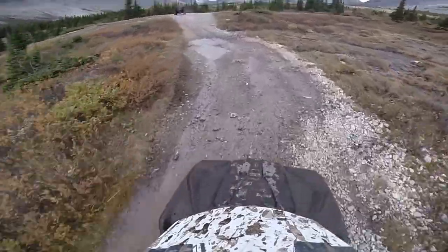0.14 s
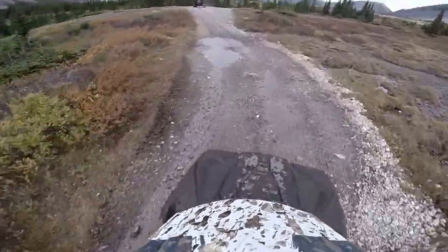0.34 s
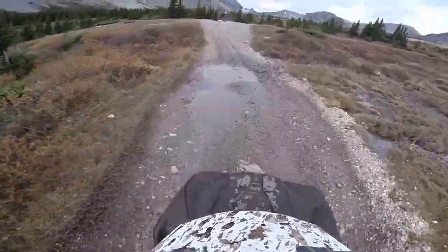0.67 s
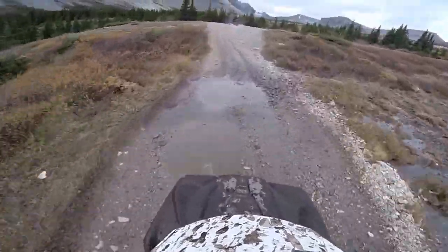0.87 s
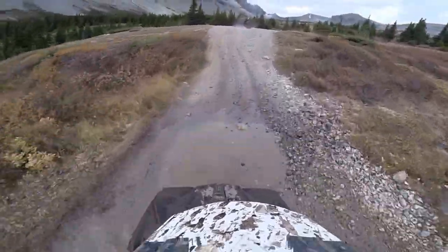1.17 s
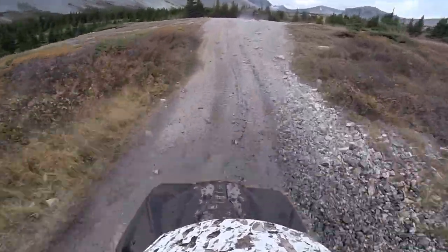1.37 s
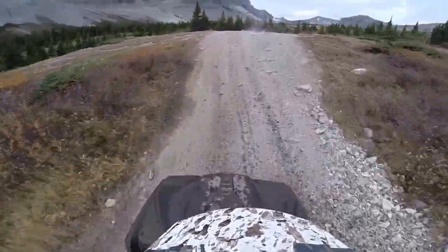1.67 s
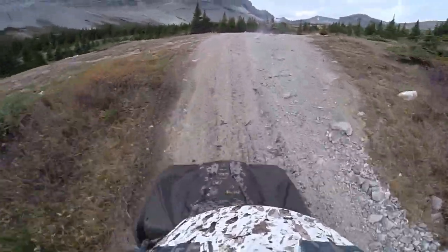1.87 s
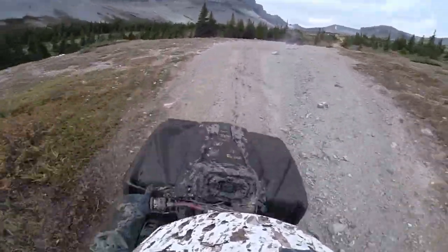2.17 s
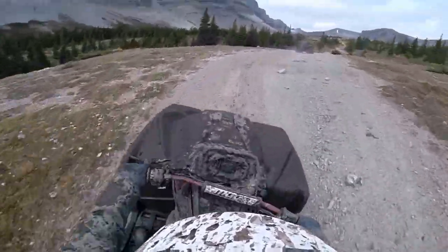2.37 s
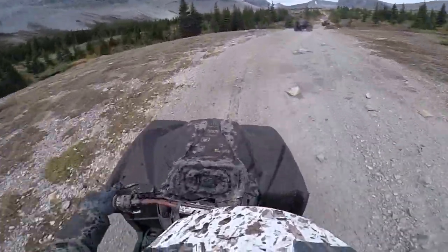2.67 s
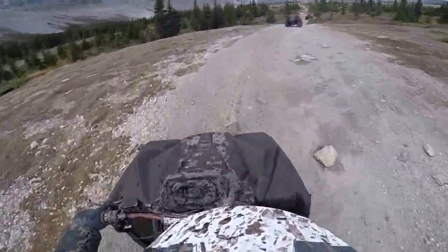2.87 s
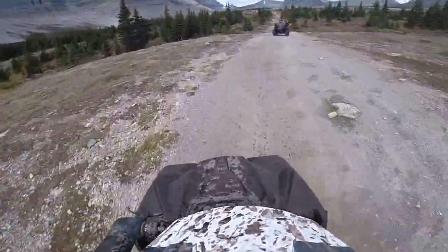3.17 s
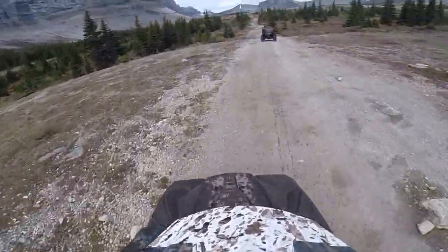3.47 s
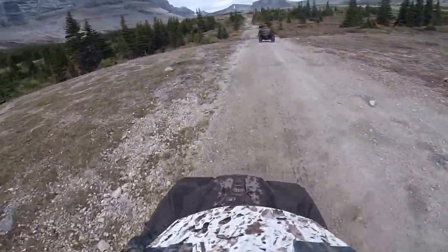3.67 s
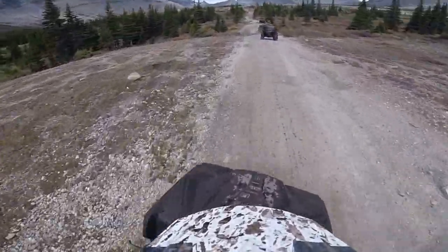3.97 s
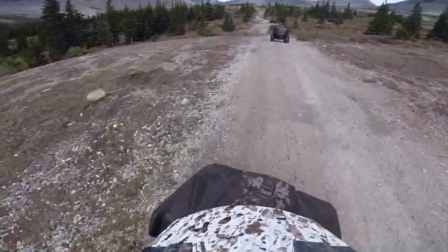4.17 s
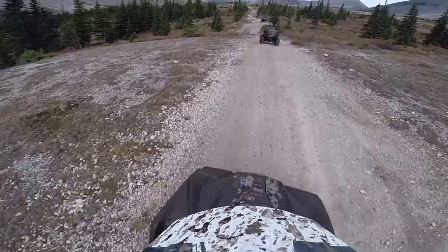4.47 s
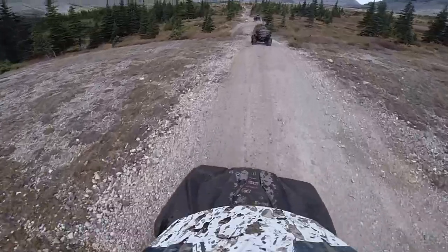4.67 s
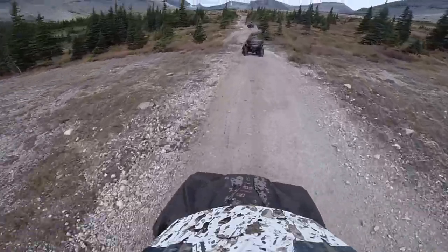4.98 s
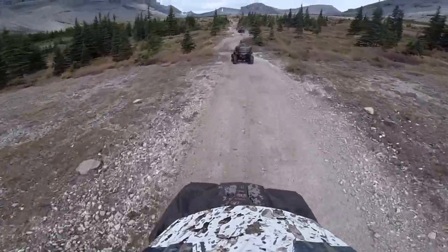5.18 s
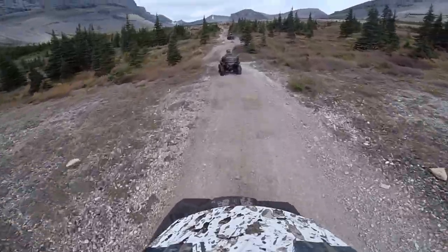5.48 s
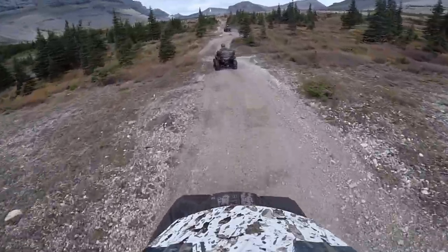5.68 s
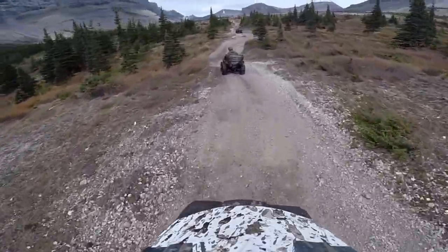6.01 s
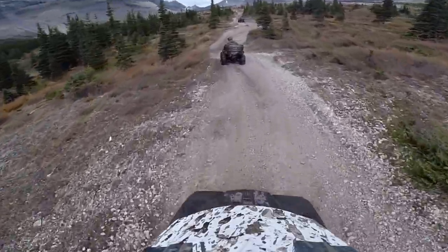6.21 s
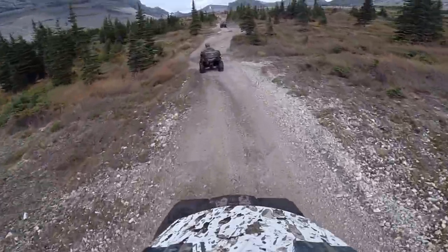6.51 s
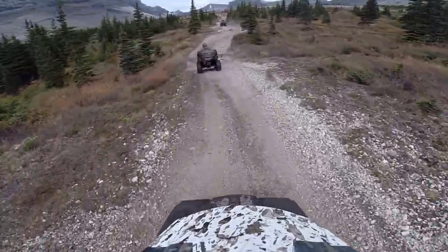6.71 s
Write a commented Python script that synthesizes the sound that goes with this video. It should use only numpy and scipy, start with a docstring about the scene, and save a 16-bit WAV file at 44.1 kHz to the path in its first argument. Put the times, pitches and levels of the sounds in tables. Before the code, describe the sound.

Close at the rider's helmet, outdoors and dry, a quad bike engine works along gravel. From 0 to 2 seconds come short uneven throttle blips, each a booming, raspy bark with brief burbles between, over dense metallic clatter. The strongest pull runs from 2.0 to 2.5, climbing in pitch, with another blip before 2.8; then the revs fall quickly to a low at about 3.3, where brakes squeak very faintly. Further surges follow at 3.5, 4.05 and 4.5. Tyres crunch and spray grit, more under throttle; stones crack and ping at about 0.7, 1.0, 1.8, 3.2, 4.3 and sharply at 4.9. From 5 seconds it coasts, slowly slowing: a rapid ringing knock stands out over softer clatter, with thin whine and hum gliding down until about 6, and a flickering disc rub. Low wind buffets throughout, and the sound stops still coasting.

```python
"""A quad bike on a gravel trail, heard by a microphone at the rider's helmet.
First come bursts of throttle: the engine's orders boom and bark through pipe resonances over a clatter of taps.
Tyres crunch as noise and clicks, stones ring the chassis modes, the brakes squeak faintly as a wavering sine.
Then a long coast: the knock, two ringing modes hit once a cycle, stands out; drive whine and hum glide down
and a brake disc rubs, all as flickering sines. Low filtered noise is the wind buffeting throughout."""
import sys
import numpy as np
from scipy import signal
from scipy.fft import rfft, irfft
from scipy.io import wavfile
from scipy.ndimage import uniform_filter1d, map_coordinates

SR = 44100
rng = np.random.default_rng(int(sys.argv[2]) if len(sys.argv) > 2 else 0)


def digitize_waveform(pressure):
    """Quantize a signal to 16-bit integers and store it at the path in sys.argv[1].

    Rows of a 2-D input are taken as channels; values are limited to [-1, 1].
    """
    field = np.atleast_2d(pressure).T
    bounded = np.clip(field, -1, 1)
    quanta = np.round(bounded * 32767).astype(np.int16)
    wavfile.write(sys.argv[1], SR, quanta)


N = 302085
TIME = np.arange(N) / SR


def from_db(db):
    """Decibels to gain."""
    return 10 ** (np.asarray(db) / 20)


def rms_one(x):
    """Scale to unit power."""
    return x / np.sqrt(np.mean(x ** 2) + 1e-20)


def in_time(rows, at=TIME):
    """Each column of a curve, joined by straight lines."""
    s, *columns = np.transpose(rows)
    return [np.interp(at, s, column) for column in columns]


def drift(rate):
    """Smooth chance of spread 1, with the given number of random knots per second."""
    knots = rng.standard_normal(4096)
    curve = map_coordinates(knots, [TIME[::16] * rate], order=3, mode="wrap")
    return rms_one(curve).repeat(16)[:N]


def colour(x, spectrum):
    """Causal (minimum-phase) filter with the given spectrum; unit power."""
    hz, db = np.transpose(spectrum)
    grid = np.maximum(np.fft.rfftfreq(8192, 1 / SR), 1)
    grid_db = np.interp(np.log(grid), np.log(hz), db, right=db[-1] - 25)
    cepstrum = irfft(np.log(from_db(grid_db)))
    half = len(cepstrum) // 2
    # folding the cepstrum onto its first half makes the response causal
    folded = np.r_[cepstrum[0], 2 * cepstrum[1:half]]
    response = irfft(np.exp(rfft(folded, 2 * half)))
    return rms_one(signal.oaconvolve(x, response)[:len(x)])


def ring(x, hz, t60):
    """A damped resonance: a unit click sets a sine of height 1 ringing, 60 dB down after t60 seconds."""
    radius, turn = from_db(-60 / (t60 * SR)), 2 * np.pi * hz / SR
    return signal.lfilter([0, np.sin(turn)], [1, -2 * radius * np.cos(turn), radius * radius], x + 1e-18)


def pipe(hz, modes):
    """Complex response of parallel resonances at a frequency."""
    return sum(from_db(db) / (1 + 1j * (hz ** 2 - centre ** 2) / (hz * width)) for centre, width, db in modes)


def contacts(cycle, angle, spread_db, play):
    """One click each cycle at the given angle, uneven in strength (dB) and timing (play, in cycles)."""
    chance = rng.standard_normal((300, 2))
    at = np.searchsorted(cycle, np.arange(len(chance)) + angle + play * chance[:, 0])
    return np.bincount(at, from_db(spread_db * chance[:, 1]), N + 1)[:N]


def grains(per_s, spread_db):
    """Random clicks of either sign and unequal size."""
    sizes = from_db(spread_db * np.minimum(rng.exponential(1, N), 4)) * rng.choice([-1, 1], N)
    return sizes * (rng.random(N) < per_s / SR)


# The rider's thumb on the throttle. Each row: opens in seconds, shuts in seconds, depth from 0 to 1.
THROTTLE_BURSTS = [(0.09, 0.28, 0.77), (0.49, 0.93, 0.57), (1.05, 1.22, 0.74), (1.35, 1.49, 0.91),
                   (1.53, 1.62, 0.17), (1.67, 1.86, 0.72), (2.0, 2.46, 0.89), (2.57, 2.76, 0.57),
                   (3.46, 3.89, 0.53), (4.05, 4.25, 0.76), (4.48, 4.67, 0.47)]
PRESS_S, EASE_S, RELEASE_S = 0.073, 0.07, .13  # time constant of the press, ease ahead of the shut, release


def throttle_opening():
    """Each burst is a press that settles exponentially, a hold and a straight release."""
    opening = 0
    for opens, shut, depth in THROTTLE_BURSTS:
        press = -np.expm1(-np.maximum(TIME - opens, 0) / PRESS_S)
        release = np.clip(1 - (TIME - shut + EASE_S) / RELEASE_S, 0, 1)
        opening = opening + depth * press * release
    return opening


# Engine speed under the bursts. Each row: time in seconds, speed in four-stroke cycles per second.
BURST_SPEED = [(0.0, 42.1), (0.1, 38.5), (0.17, 40.9), (0.26, 42.7), (0.36, 40.2), (0.49, 36.6),
               (0.7, 43.7), (0.93, 46.0), (1.05, 40.3), (1.22, 44.8), (1.34, 39.2), (1.48, 41.1),
               (1.58, 39.9), (1.68, 40.1), (1.87, 42.9), (1.98, 38.4), (2.1, 43.6), (2.3, 49.6),
               (2.78, 48.9), (2.84, 45.5), (2.89, 39.8), (3.02, 33.9), (3.14, 31.5), (3.22, 31.5),
               (3.35, 30.2), (3.46, 31.6), (3.68, 41.7), (3.86, 47.6), (4.05, 37.6), (4.23, 42.9),
               (4.3, 39.4), (4.38, 36.6), (4.45, 33.6), (4.68, 38.1), (4.73, 35.0), (4.79, 33.1),
               (4.89, 30.9)]
# The long coast, engine slowing with the wheels. Each row: time in seconds, speed in cycles per second.
COAST_SPEED = [(4.96, 30.17), (5.1, 29.98), (5.35, 29.1), (5.6, 28.72), (5.85, 28.22), (6.1, 27.26),
               (6.35, 26.53), (6.6, 26.58), (6.85, 25.38)]


def engine_speed():
    """The engine spins up during bursts and runs down between them; then it coasts."""
    return in_time(BURST_SPEED + COAST_SPEED)[0]


# The engine's low orders, before silencer and boom. Each row: order (multiple of the cycle rate),
# level in dB coasting, level in dB on the overrun, level in dB pulling, level in dB flat out.
LOW_ORDERS = [(2, -30.5, -42.5, -39.5, -36.5), (3, -38.5, -45.5, -42.5, -24), (4, -63, -38, -42, -42.5),
              (5, -44, -45, -34.5, -30.0), (6, -32, -41, -36.5, -35.5), (7, -52, -55, -42.5, -36.5),
              (8, -49, -49, -31.5, -35), (9, -44.5, -47.5, -38, -40), (10, -49, -58, -54, -61),
              (11, -60.5, -50, -50, -35), (12, -54, -62, -34.5, -36), (13, -51, -59.5, -75, -34.5),
              (14, -59.5, -48, -40, -38.5), (15, -49.5, -63, -53, -41), (16, -92, -52, -42.5, -38),
              (17, -57.5, -54, -44, -74), (18, -61.5, -81, -52, -48), (19, -71, -52.5, -41, -47.5),
              (20, -65.5, -76, -54, -63), (21, -53, -72, -60, -43), (22, -68, -64, -44, -39),
              (23, -59.5, -65, -65, -66), (24, -66.5, -73, -44, -37.5)]
OVERRUN_SPEEDS, FLAT_OUT_SPEEDS = (29, 37), (43, 49)  # cycles per s over which each state sets in
BOOM_FULL = 0.74  # throttle at which the low orders reach full strength


def order_levels(speed, throttle, drone_orders=6):
    """Low orders in dB, blending from coasting to overrun with speed and to pulling or flat out with throttle."""
    fast = np.interp(speed, OVERRUN_SPEEDS, [0, 1])
    top = np.interp(speed, FLAT_OUT_SPEEDS, [0, 1])
    drone = np.interp(speed, [47, 49], [0, .7])  # at top speed the lowest orders drone on without throttle
    levels = {}
    for k, row in enumerate(LOW_ORDERS, 2):
        push = np.maximum(np.clip(throttle / BOOM_FULL, 0, 1), drone * (k <= drone_orders))
        shares = np.array([(1 - push) * (1 - fast), (1 - push) * fast, push * (1 - top), push * top])
        levels[k] = np.array(row[1:]) @ shares
    return levels


# Sharp pressure pulses sent out each cycle. Each row: angle in cycles, relative strength.
PRESSURE_PULSES = [(.45, 1), (.63, .8), (0, 1)]
# Pipe resonances that bark with the throttle open, relative to the bark.
# Each row: centre in Hz, width in Hz, level in dB before a common trim.
OPEN_RESONANCES = [(890, 65, -16), (1232, 86, -18), (1736, 190, -20.5), (2520, 410, -30)]
# Pipe resonances that time the single putt with the throttle shut; only their phase is heard.
# Each row: centre in Hz, width in Hz, weight in dB.
SHUT_RESONANCES = [(73, 28, -3), (238, 55, 0), (430, 80, -7), (620, 200, -16), (843, 96, -15)]
# The silencer, through which the low orders sweep. Each row: frequency in Hz, gain in dB.
SILENCER_GAIN = [(50.0, -22), (62.0, -3), (78.0, 0.5), (98.0, 4.5), (130.0, 2.3), (158.0, -26), (185.0, -3),
                 (212.0, 8), (245.0, 5), (270.0, -0.5), (295.0, 4), (340.0, -1.8), (375.0, -1),
                 (435.0, 3.5), (490.0, -2), (560.0, -6.5), (640.0, 0.5), (740.0, -6.5), (870.0, 4),
                 (1050.0, -6)]
# The boom of the low orders, fading out above BOOM_TOP_HZ. Each row: time in seconds, gain in dB.
BOOM_GAIN = [(0.03, 0), (0.2, 2), (0.36, -1), (0.55, 3), (0.7, 1), (0.86, 1.5), (1.03, 2.5), (1.2, 0.5),
             (1.45, 0.5), (1.65, 1.5), (1.85, 0.5), (2.2, 1), (2.52, -0.5), (2.68, 3), (2.8, 2.5), (3.0, 3),
             (3.35, -1.5), (3.55, 1), (3.8, 2.5), (4.0, -0.5), (4.25, 0.5), (4.4, -3), (4.55, 1), (4.8, 2),
             (5.0, 0), (6.85, -2.5)]
BOOM_TOP_HZ = 350
PUTT_ANGLE = .45  # place of the putt in the cycle
SMEAR_AT_HZ = 560  # the pipes delay the upper orders: one radian here, growing with the square of pitch
PART_SPEED_SMEAR = 2.2  # extra smear under load below top speed, where the pulses are blunter
# after every burst but the last the firing stumbles: delay in s, spread in s, unevenness in cycles
STUMBLE_AFTER_S, STUMBLE_S, STUMBLE_CYCLES = .08, .05, .008
WAVER_DB, WAVER_PER_S = 1.4, 16  # under load each low order wavers by itself, the upper ones up to twice as much


def exhaust(cycle, speed, throttle, load, bark_db, open_db=-5.0, first_db=-48, count=58):
    """Gas pulses repeat each cycle: their orders sweep through pipe resonances, and no two firings are alike."""
    # gains move slowly, so they are worked out at every 64th sample
    slow, speed, throttle, opening, bark_db = (v[::64] for v in (TIME, speed, throttle, load, bark_db))
    order_db, boom_db = order_levels(speed, throttle), in_time(BOOM_GAIN, slow)[0]
    stumble = sum(np.exp(-((TIME - shut - STUMBLE_AFTER_S) / STUMBLE_S) ** 2)
                  for _, shut, _ in THROTTLE_BURSTS[:-1])
    unevenness = .0012 + .002 * load + STUMBLE_CYCLES * stumble
    turn = np.exp(2j * np.pi * (cycle + unevenness * drift(45)))
    below_top_speed = np.interp(speed, FLAT_OUT_SPEEDS, [1, 0])
    smear = 1 + PART_SPEED_SMEAR * uniform_filter1d(opening * below_top_speed, size=100)
    out, wave = np.zeros(N), 1
    for k in range(1, count + 1):
        wave, hz = wave * turn, k * speed
        pulses = sum(strength * np.exp(-2j * np.pi * k * angle) for angle, strength in PRESSURE_PULSES)
        if k in order_db:
            # the low orders line up into sharp pulses under load, and into one ringing putt without
            putt = np.exp(1j * np.angle(pipe(hz, SHUT_RESONANCES)) - 2j * np.pi * k * PUTT_ANGLE)
            timing = uniform_filter1d(opening * pulses + (1 - opening) * putt, size=90)
            below_top = 1 / (1 + (hz / BOOM_TOP_HZ) ** 6)
            waver_db = WAVER_DB * (2 - below_top) * opening * drift(WAVER_PER_S)[::64]
            silencer_db = np.interp(hz, *np.transpose(SILENCER_GAIN))
            level_db = order_db[k] + silencer_db + below_top * boom_db + waver_db
            gain = from_db(level_db) * np.exp(1j * np.angle(timing))
        else:
            bark = opening * from_db(bark_db + open_db) * pulses * pipe(hz, OPEN_RESONANCES)
            gain = bark + from_db(first_db) * (k == 1)
        gain = gain * np.exp(-1j * smear * (hz / SMEAR_AT_HZ) ** 2)
        out += np.sqrt(2) * (np.interp(TIME, slow, gain) * wave).real
    return out


def puffs(cycle, width=0.057):
    """A swell of gas flow at each pressure pulse."""
    swell = 0
    for angle, strength in PRESSURE_PULSES:
        distance = (cycle - angle + .5) % 1 - .5  # cycles from the pulse
        swell = swell + strength * np.exp(-(distance / width) ** 2)
    return swell


# Colour of the turbulent exhaust gas. Each row: frequency in Hz, relative density in dB per Hz.
CHUFF_COLOUR = [(40, -60), (90, -4), (165, -13.5), (240, 1), (420, -1.5), (600, -9), (1000, -20),
                (2000, -18)]
CHUFF_DB = -13.5  # relative to the bark


def chuff(cycle, bark_db, puff_db=5):
    """Turbulent gas leaves as noise that swells with each pulse."""
    gas = rng.standard_normal(N) * from_db(puff_db * puffs(cycle))
    return from_db(bark_db + CHUFF_DB) * colour(gas, CHUFF_COLOUR)


# Stray firings that set one pipe resonance booming.
# Each row: time at the height in seconds, spread in seconds, mean pitch in Hz, level in dB before roughness.
PIPE_BURBLES = [(0.03, 0.054, 440, -36), (0.97, 0.02, 273, -33), (1.22, 0.052, 414, -39),
                (1.33, 0.021, 435, -38.5), (1.45, 0.054, 293.4, -31.5), (1.6, 0.17, 440, -39.5),
                (2.85, 0.054, 258.5, -34), (2.87, 0.053, 137, -32), (3.95, 0.029, 129, -30),
                (4.33, 0.053, 120.9, -32)]


def burbles(waver=0.0299, rough_db=2.0):
    """Uneven firings around a change of throttle make a pipe boom briefly at its own pitch."""
    rough = from_db(rough_db * drift(45))
    sway = np.cumsum(1 + waver * drift(60)) / SR
    booms = 0
    for s, spread, hz, db in PIPE_BURBLES:
        swell = np.exp(-((TIME - s) / spread) ** 2)
        booms = booms + np.sqrt(2) * from_db(db) * swell * np.sin(2 * np.pi * hz * sway)
    return booms * rough


# Colour of the engine's casing under load. Each row: frequency in Hz, relative density in dB per Hz.
LOADED_CASING = [(290, -14.5), (500, 2), (630, -4), (728, 0.5), (769, -8.5), (878, 4.5), (1040, -8.5),
                 (1720, 3.5), (2030, -4.5), (2510, -0.5), (2850, -5.5), (3300, -14), (4500, -14.5),
                 (5370, -22.5), (5740, -22.5), (7000, -25), (9100, -46.5), (15400, -120)]
# Colour of the casing when coasting. Each row: frequency in Hz, relative density in dB per Hz.
COASTING_CASING = [(260, 3.5), (450, 0), (488, -10.5), (600, -5), (763, -10.5), (827, -4), (896, -9),
                   (1310, -8.5), (1570, -6.5), (1790, -8), (2270, -5.5), (2850, -9.5), (3150, -19.5),
                   (4370, -20), (4850, -21), (7000, -55), (9100, -51), (15400, -120)]


def clatter(cycle, load, clatter_db, count=22):
    """Valve gear, chain and piston touch at set angles each cycle, over a pulsing rasp; both shake the casing."""
    angles = (np.arange(count) + rng.random(count)) / count
    taps = sum(rng.choice([-1, 1]) * contacts(cycle, angle, spread_db=2.5, play=.0010) for angle in angles)
    rasp = rng.standard_normal(N) * from_db(3.8 * load * puffs(cycle) + 1.45 * drift(70))
    shake = rms_one(from_db(-1.5) * rms_one(taps) + rms_one(rasp))
    loaded = np.sqrt(load) * from_db(-1.45) * colour(shake, LOADED_CASING)
    later_shake = np.roll(shake, SR // 100)  # 10 ms
    coasting = np.sqrt(1 - load) * from_db(1.0) * colour(later_shake, COASTING_CASING)
    return from_db(clatter_db) * (loaded + coasting)


# Strength of the usual knock. Each row: time in seconds, blow in dB.
KNOCK_STRENGTH = [(0, -34.5), (4.7, -32), (4.85, -37), (5.05, -27), (5.21, -36), (5.28, -28.5), (5.48, -30),
                  (5.58, -30.5), (6.0, -32), (6.17, -29), (6.3, -30), (6.85, -31.5)]
# Now and then the slack takes up with a harder knock. Each row: time in seconds, blow in dB.
HARDER_KNOCKS = [(4.765, -26), (5.057, -27), (5.327, -26.5), (5.499, -25.5), (5.637, -24.5), (5.779, -25),
                 (5.956, -26.5), (6.399, -28), (6.587, -26.5), (6.626, -28), (6.702, -26)]


def knock(cycle):
    """Slack in the engine takes up with a short ringing knock and two light rebounds every cycle."""
    blows = contacts(cycle, .45, spread_db=1.1, play=.002)
    blows = blows + .17 * contacts(cycle, .63, spread_db=3.0, play=.02)
    blows = blows + .14 * contacts(cycle, .81, spread_db=3.0, play=.02)
    blows = blows * from_db(in_time(KNOCK_STRENGTH)[0])
    for s, db in HARDER_KNOCKS:  # a hard knock takes the place of the usual one
        blows[abs(TIME - s) < .008] = 0
        blows[round(s * SR)] = from_db(db)
    # the lower mode varies from blow to blow
    body = ring(blows, 1583, 0.021) + 0.26 * drift(25) * ring(blows, 1280, 0.011)
    body = signal.sosfilt(signal.butter(2, 1200, "high", fs=SR, output="sos"), body)
    edge = np.gradient(ring(blows, 2100, 0.0026)) * 0.28
    return body + edge


# In the four tables below the flicker and any trim come on top of the level.
# Drive whine, gliding down with road speed. Each row: time in seconds, pitch in Hz, level in dB.
DRIVE_WHINE = [(4.98, 4800, -66), (5.07, 4690, -55), (5.14, 4580, -65), (5.2, 4480, -55), (5.3, 4320, -55),
               (5.42, 4210, -55), (5.49, 4130, -67), (5.55, 4040, -60), (5.65, 3900, -60),
               (5.79, 3770, -57), (5.86, 3680, -74)]
# Final drive hum, sinking with road speed. Each row: time in seconds, pitch in Hz, level in dB.
FINAL_DRIVE_HUM = [(5.1, 834, -66), (5.3, 785, -59), (5.6, 725, -60), (5.85, 660, -61), (6.1, 625, -70)]
# The brakes squeak faintly. Each row: time in seconds, pitch in Hz, level in dB.
BRAKE_SQUEAK = [(3.3, 4900, -72), (3.325, 4900, -57), (3.38, 4870, -56), (3.42, 4860, -75)]
# A brake disc rubs. Each row: time in seconds, pitch in Hz, level in dB.
DISC_RUB = [(5.25, 4600, -72), (5.42, 4570, -65), (5.6, 4510, -68), (5.8, 4500, -75), (6.05, 4480, -72),
            (6.15, 4470, -64), (6.3, 4440, -68), (6.42, 4420, -65), (6.6, 4380, -76)]


def tone(rows, waver, flicker_db):
    """A sine of wavering pitch and flickering level, sounding from the first row to the last."""
    hz, db = in_time(rows)
    sounding = (TIME > rows[0][0]) & (TIME < rows[-1][0])
    phase = 2 * np.pi * np.cumsum(hz * (1 + waver * drift(150))) / SR
    level = from_db(db + flicker_db * (drift(30) + 1.5))
    return sounding * np.sqrt(2) * level * np.sin(phase)


def drive_and_brakes():
    """Meshing drive and rubbing brakes each give a metallic whistle or hum."""
    whine = tone(DRIVE_WHINE, waver=.006, flicker_db=1.2) * from_db(-2)
    hum = tone(FINAL_DRIVE_HUM, waver=.006, flicker_db=2.0)
    squeak = tone(BRAKE_SQUEAK, waver=.006, flicker_db=0.0)
    rub = tone(DISC_RUB, waver=.011, flicker_db=3.0)
    return whine + hum + squeak + rub


# The trail under the tyres, with throttle shut and before each layer's trim.
# Each row: time in seconds, gravel crunch in dB, fine spray in dB.
TRAIL_LEVELS = [(0, -42, -63), (1.05, -46, -67), (1.55, -42, -60.5), (1.98, -50, -68), (2.4, -40.5, -62.5),
                (2.8, -41, -64.5), (3.05, -49.5, -71.5), (3.55, -49, -70.5), (4.45, -51, -64.5),
                (5.0, -49.5, -72), (5.9, -54.5, -72.5), (6.85, -56.5, -73)]
# Colour of the gravel's crunch. Each row: frequency in Hz, relative density in dB per Hz.
CRUNCH_COLOUR = [(2500, -2), (3300, -30), (3800, -5), (4600, 9), (5000, -4), (5700, 4.5), (6400, -3),
                 (7100, -5), (8200, -11), (11000, -56)]
# Colour of the spray. Each row: frequency in Hz, relative density in dB per Hz.
SPRAY_COLOUR = [(5000, -10), (8000, 1.5), (10500, -3), (12000, -8), (15000, -16)]
CRUNCH_THROTTLE_DB, SPRAY_THROTTLE_DB = 4.5, 5  # gain at full throttle: driven wheels dig in


def tyres(throttle):
    """Gravel crunches under the tread as clicks and noise; grit and water spray off it as finer clicks."""
    crunch_db, spray_db = in_time(TRAIL_LEVELS)
    crunch_db = crunch_db + CRUNCH_THROTTLE_DB * throttle - 6.5
    spray_db = spray_db + SPRAY_THROTTLE_DB * throttle - 0.1
    gravel = rms_one(grains(per_s=5000, spread_db=0.5)) + rng.standard_normal(N)
    crunch = from_db(crunch_db) * colour(gravel, CRUNCH_COLOUR)
    spray = from_db(spray_db) * colour(grains(per_s=12000, spread_db=3.5), SPRAY_COLOUR)
    return crunch + spray


# Stones that hit the chassis, levels before each part's trim. Each row: time in seconds, scrape decay
# in seconds, guard in dB, frame in dB, crack in dB, ping t60 in seconds, lower ping in Hz, its level in dB,
# upper ping in Hz, its level in dB.
STONE_HITS = [(0.718, .016, -36, -55, -48, 0.0043, 4600, -46, 3470, -49),
              (0.7474, 0.014, -43, -62, -50, .002, 6000, -54, 10300, -60),
              (0.757, 0.0054, -48, -64, -54, 0.028, 5460, -57, 6900, -60),
              (1.0223, 0.014, -39, -62, -45, 0.023, 4230, -57, 9650, -71),
              (1.331, .008, -37, -61, -51, .003, 3800, -58, 12300, -70),
              (1.7883, 0.0037, -44, -62, -44, 0.0056, 5660, -57, 9300, -69),
              (3.158, 0.0067, -27.5, -62, -55, .005, 2300, -53, 4100, -62),
              (3.275, 0.0075, -35.5, -60, -44, .003, 4700, -51, 12900, -74),
              (4.304, 0.0045, -42, -60, -47, 0.012, 5750, -58, 10700, -65),
              (4.3136, 0.0066, -30.5, -57, -41, .006, 4300, -55, 10750, -62),
              (4.3312, 0.0089, -34, -57, -41, .005, 4280, -53, 7300, -58),
              (4.8966, 0.0038, -28.5, -47, -39, .008, 2770, -46, 4400, -50),
              (4.9002, 0.0073, -45, -44, -35, .014, 5650, -50, 7100, -54)]
# Modes of the steel frame. Each row: pitch in Hz, level in dB before a common trim, t60 in seconds.
FRAME_MODES = [(2100, 10, .015), (2840, 21, 0.031), (3850, 18.5, 0.032), (4400, 15, 0.04),
               (5750, 15.5, 0.061), (7080, 12, .035), (8300, 4, 0.027), (9550, -4, .035)]
# Colour of a stone's crack. Each row: frequency in Hz, relative density in dB per Hz.
CRACK_COLOUR = [(800, -6), (2400, 18), (3200, 4.5), (5000, 8.5), (7200, 6.5), (9000, -7), (12000, -16),
                (15000, -28)]


def stones(ring_db=-26.0, thud_db=-9.0):
    """Each stone cracks and scrapes briefly; plastic guard and steel frame ring, with two pings per spot struck."""
    age = TIME[:SR // 12]
    out = np.zeros(N)
    for s, scrape_s, guard_db, frame_db, crack_db, ping_s, low_hz, low_db, high_hz, high_db in STONE_HITS:
        scrape = rng.standard_normal(len(age)) * np.exp(-age / scrape_s)
        blow = 12 * (age == 0) + .5 * scrape  # the first contact is the hardest
        frame = sum((-1) ** k * from_db(db + ring_db) * ring(blow, hz, t60)
                    for k, (hz, db, t60) in enumerate(FRAME_MODES))
        pings = from_db(low_db) * ring(scrape, low_hz, ping_s) + from_db(high_db) * ring(scrape, high_hz, ping_s)
        crack = from_db(crack_db + 3.5) * np.std(scrape) * colour(scrape, CRACK_COLOUR)
        guard = from_db(thud_db) * (ring(scrape, 1860, 0.0052) - ring(scrape, 2500, 0.0062))
        start = round(s * SR)
        out[start:start + len(age)] += from_db(frame_db) * frame + pings + crack + from_db(guard_db) * guard
    return out


# Wind at the microphone. Each row: time in seconds, level in dB before a small trim.
WIND_GUSTS = [(0.0, -44), (0.04, -34.5), (0.78, -38), (0.9, -29), (1.09, -38.5), (1.22, -34), (1.58, -38),
              (1.75, -29), (1.79, -35.5), (2.52, -30), (2.76, -35), (3.5, -38), (5.51, -44.5), (6.81, -40),
              (6.85, -40)]
# Colour of the wind. Each row: frequency in Hz, relative density in dB per Hz.
WIND_COLOUR = [(3, -23), (15, -2), (22, 2), (30, 7), (42, -4), (58, -1), (80, -14), (150, -13), (400, -48)]


def wind():
    """Turbulent air buffets the microphone: low noise rising and falling with the gusts."""
    return from_db(in_time(WIND_GUSTS)[0] + 1.0) * colour(rng.standard_normal(N), WIND_COLOUR)


# Clatter with the throttle shut, at cruise speed. Each row: time in seconds, level in dB.
CLATTER_LEVEL = [(0, -35), (0.25, -34.5), (0.43, -36), (0.6, -35), (1.0, -35), (1.13, -33.5), (1.3, -34.5),
                 (1.55, -33.5), (1.85, -34), (2.3, -32.5), (2.95, -31.5), (3.7, -32.5), (4.05, -35.5),
                 (4.5, -37), (5.0, -37.5), (6.85, -38.5)]
CLATTER_THROTTLE_DB, CLATTER_SPEED_DB = 4, 0.23  # its gain at full throttle, and per cycle per s
CRUISE_SPEED = 40  # cycles per s; the base levels of clatter and bark hold at this speed
# exhaust bark: throttle shut, gain at full throttle, gain per cycle per s, change in the coast
BARK_DB, BARK_THROTTLE_DB, BARK_SPEED_DB, BARK_COAST_DB = -35.5, 9, 0.27, -13
UNLOADED_DB, LOAD_RANGE_DB = -37, 6  # bark at no load, and its rise to full load
COAST_ANGLE = .572  # place in the cycle at which the coast begins


def scene():
    """Engine, drive, trail and wind at the helmet."""
    speed, throttle = engine_speed(), throttle_opening()
    coast_s = COAST_SPEED[0][0]
    cycle = np.cumsum(speed) / SR
    cycle = cycle - (cycle[round(coast_s * SR)] - COAST_ANGLE) % 1
    coasting = np.interp(TIME, [THROTTLE_BURSTS[-1][1], coast_s], [0, 1])
    extra_speed = speed - CRUISE_SPEED
    bark_db = BARK_DB + BARK_THROTTLE_DB * throttle + BARK_SPEED_DB * extra_speed + BARK_COAST_DB * coasting
    clatter_db = in_time(CLATTER_LEVEL)[0] + CLATTER_THROTTLE_DB * throttle + CLATTER_SPEED_DB * extra_speed
    load = np.clip((bark_db - UNLOADED_DB) / LOAD_RANGE_DB, 0, 1)  # the harder the bark, the greater the load
    pipes = exhaust(cycle, speed, throttle, load, bark_db) + chuff(cycle, bark_db) + burbles()
    engine = pipes + clatter(cycle, load, clatter_db) + knock(cycle)
    return (engine + drive_and_brakes() + tyres(throttle) + stones() + wind())[None]


def record(dry):
    """The top is cut steeply above 15.2 kHz."""
    return signal.sosfilt(signal.ellip(10, .1, 90, 15200, fs=SR, output="sos"), dry)


dry = scene()
out = record(dry)
digitize_waveform(out)
```